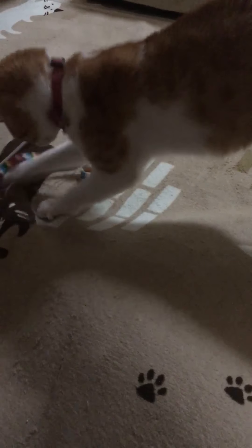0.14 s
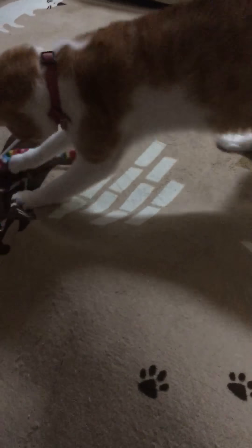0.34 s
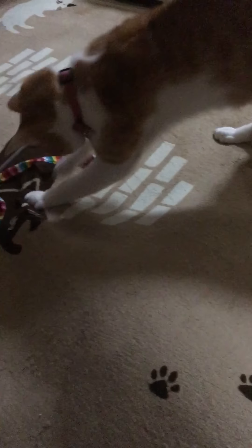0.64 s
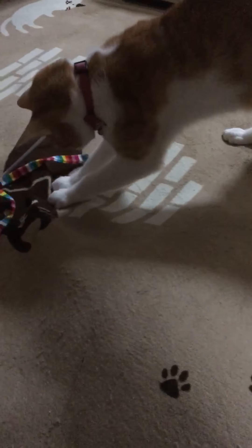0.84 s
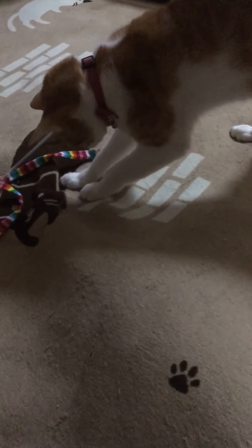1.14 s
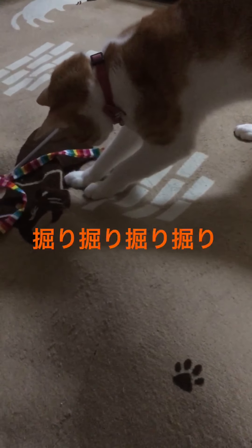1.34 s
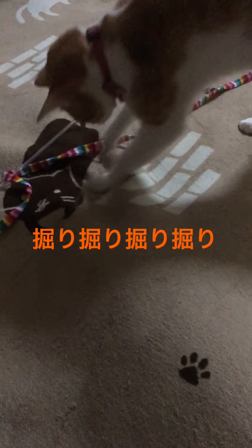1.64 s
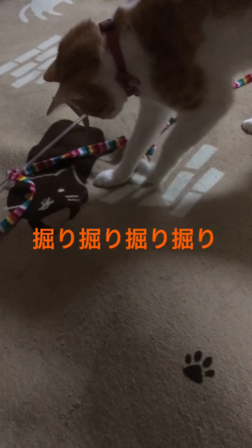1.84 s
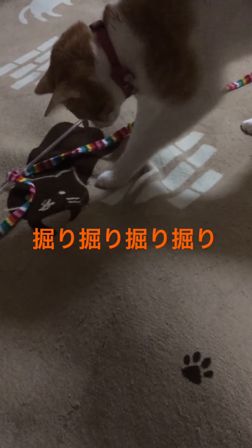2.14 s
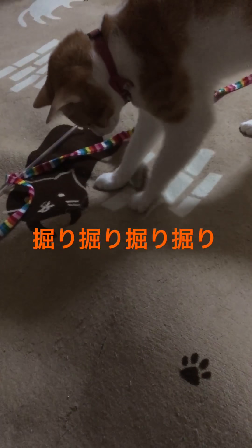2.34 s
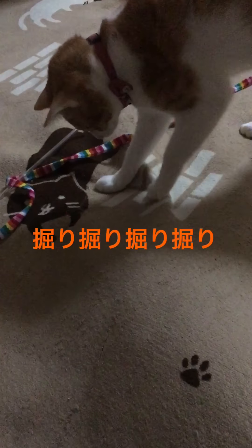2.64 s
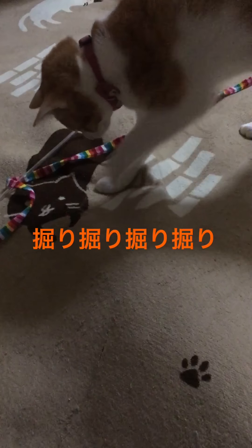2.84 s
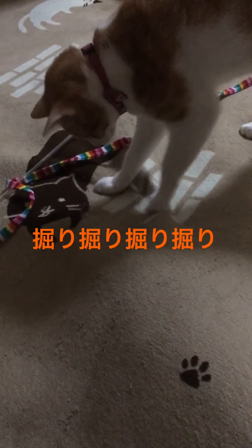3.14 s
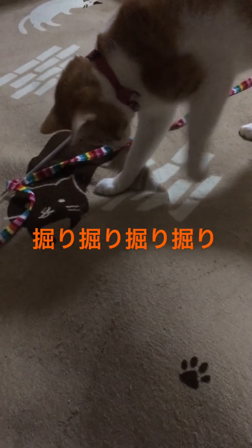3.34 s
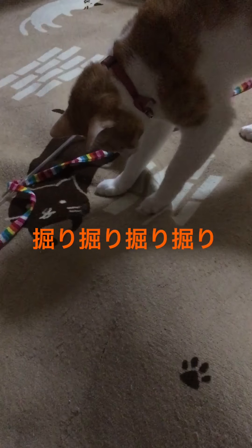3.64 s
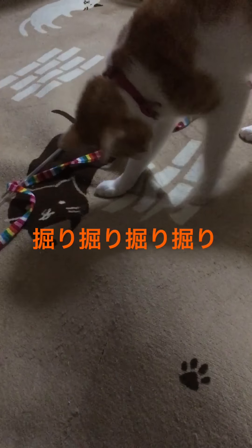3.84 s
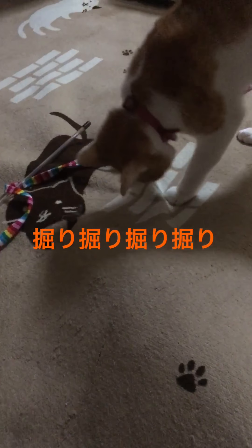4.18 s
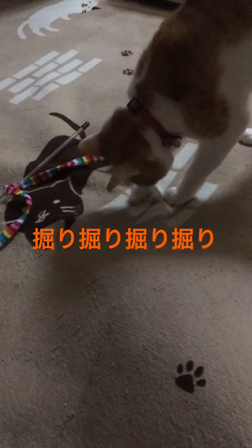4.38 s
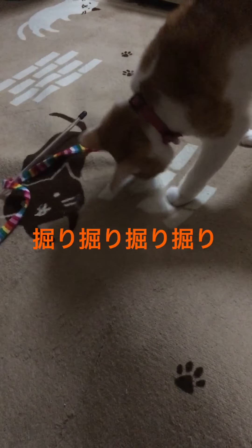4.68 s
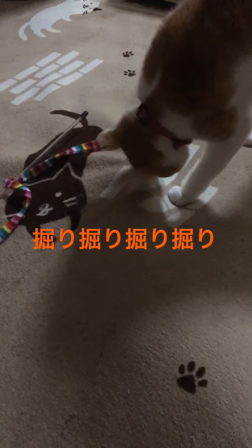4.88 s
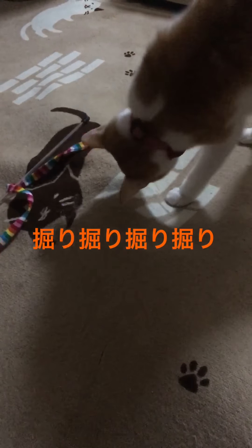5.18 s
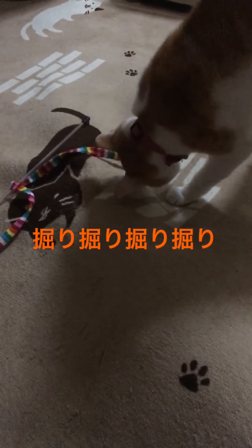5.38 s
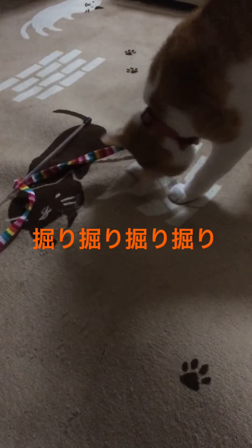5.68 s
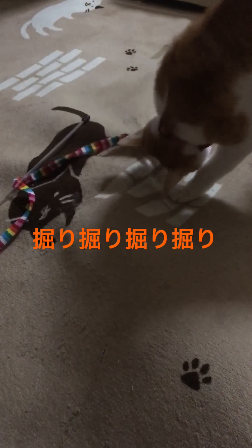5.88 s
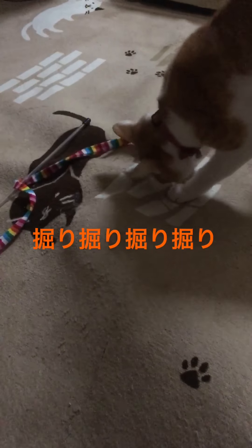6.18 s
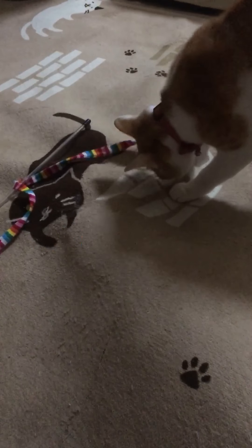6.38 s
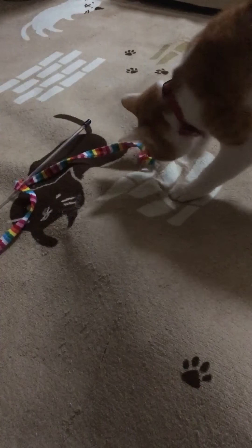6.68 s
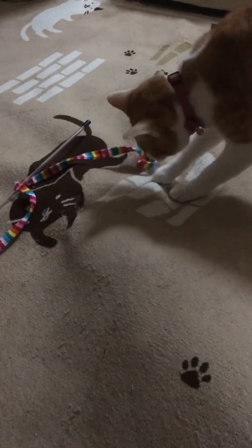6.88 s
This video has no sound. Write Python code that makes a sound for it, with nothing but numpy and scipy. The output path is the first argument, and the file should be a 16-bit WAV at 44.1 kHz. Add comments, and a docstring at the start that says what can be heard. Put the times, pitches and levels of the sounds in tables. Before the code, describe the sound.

Short scuffs of paws over carpet pile alternate with irregular plucks and snaps of caught threads. Loud snaps come early, around two seconds, near the five-second mark and in clusters near six, often with a cushioned floor thump. A tiny muffled bell rattles briefly between them. Low motor hum and soft air noise continue throughout; close mono microphone in a small indoor space.

```python
"""A cat digs at a rug: tufts flick past its paws, and claws catch in threads that let go with a snap.
The rug slaps the floor, often together with a hard snap: two soft pushes, first its edge, then its fold.
A small muffled bell on the cat's harness rattles: a pellet hits the shell and rings its damped modes.
The place is a small room with short reflections, where an appliance hums under steady air noise.
The microphone signal is mono, with the treble cut at the top."""
import sys
import numpy as np
from scipy import signal
from scipy.fft import rfft, irfft
from scipy.io import wavfile

SR = 44100
rng = np.random.default_rng(int(sys.argv[2]) if len(sys.argv) > 2 else 0)


def pcm_store(signal):
    """Save signal as 16-bit PCM."""
    levels = np.round(np.clip(np.atleast_2d(signal), -1, 1) * 32767)
    wavfile.write(sys.argv[1], SR, levels.astype(np.int16).T)


N = 309476  # samples in the scene
TAPS = 4096  # samples in each short sound


def amp(db):
    """Decibels to gain."""
    return 10 ** (np.asarray(db) / 20)


def unit(x):
    """Scales to rms 1."""
    return x / np.sqrt(np.mean(x ** 2) + 1e-20)


def read(points, hz):
    """Reads a curve on a log-frequency axis."""
    f, value = np.transpose(points)
    return np.interp(np.log(hz + 1), np.log(f + 1), value)


def add(mix, s, sound):
    """Mixes a sound in at time s in seconds."""
    part = mix[max(round(s * SR), 0):][:len(sound)]
    part += sound[:len(part)]


def bump_db(hz, centre, q):
    """Gain of a damped resonance, 0 dB near its centre; a higher q is sharper."""
    ratio = (hz + 1) / centre
    return -10 * np.log10(1 + (q * (ratio - 1 / ratio)) ** 2)


def pulse(gain_db):
    """The most compact causal (minimum-phase) pulse with the given spectrum."""
    log_gain = np.log(amp(np.maximum(gain_db, -100)))
    circle = np.r_[log_gain, log_gain[-2:0:-1]]
    # the phase follows from the log gain
    spectrum = np.exp(np.conj(signal.hilbert(circle)))
    return irfft(spectrum[:len(log_gain)])


def coloured(x, gain, band):
    """Filters x so that it has rms 1 within the band in Hz."""
    hz = np.fft.rfftfreq(N, 1 / SR)
    z = rfft(x) * gain
    in_band = irfft(z * (hz > band[0]) * (hz < band[1]), N)
    return irfft(z, N) / in_band.std()


def drift(rate):
    """Slow chance of rms 1 that varies up to about the given rate in Hz."""
    hz = np.fft.rfftfreq(N, 1 / SR)
    return unit(irfft(rfft(rng.standard_normal(N)) / (1 + (hz / rate) ** 4), N))


# Claws letting go of threads. Each row: time in seconds, strength in dB before the shared trim,
# centre of the twang in Hz, extra tick in the treble in dB, ring of the thread in Hz, ring in dB.
THREAD_SNAPS = [(0.3609, -17, 1900, -1, 4200, 7), (0.4304, -22.5, 540, 2, 3150, 8),
                (.4765, -9, 694, -8, 4250, 3), (.484, -3, 546, 0.5, 1170, 5.5),
                (.630, -0.5, 690, 1, 3700, 1.5), (1.0323, -29.5, 1450, 2, 3500, 5),
                (1.091, -21.5, 1140, 12, 3200, 10), (1.58, -25, 1400, -15, 3910, 3),
                (1.6565, -1.5, 625, 6, 1240, 5), (1.6622, -12.5, 700, -1, 12000, 13),
                (2.0162, -27, 950, 14, 3020, 11), (2.0493, -14.5, 1220, -5, 4640, 10),
                (2.1151, -5.5, 1420, -2, 2820, 7), (2.117, -2, 1130, -9.5, 3080, 2),
                (2.3884, -14.5, 1210, 2, 3130, 7.5), (2.6393, -22.5, 3290, -12, 1650, 9.5),
                (2.7285, -15.5, 1170, -10, 1970, 1.5), (2.8323, -15, 1010, 7.5, 2240, 5.5),
                (2.8716, -10.5, 880, 6.5, 1920, 1), (3.0983, -25.5, 1440, -7, 1600, 13),
                (3.2027, -21, 2930, -10, 8100, 0), (3.3756, -13, 1910, -7.5, 9100, 11.5),
                (3.392, -26, 1700, 7, 3200, 2), (3.4171, -16.5, 1300, 1, 4190, 0),
                (3.6824, -14.5, 2400, 2.5, 1280, 6.5), (3.7326, -20.5, 3290, 4, 1730, 12),
                (3.8898, -9, 1330, -1, 5000, 2.5), (4.3018, -25, 1240, 8.5, 3400, 5),
                (4.585, -27.5, 1200, 4, 2190, 8), (4.6868, -5.5, 800, 7.5, 3450, 14.5),
                (4.7368, -22, 540, 11, 1600, 13), (4.7504, -15, 960, 2, 3100, 5),
                (4.7552, -6.5, 1980, 3.5, 1600, 4), (5.1204, -4, 1130, 1, 3500, 4.5),
                (5.8697, -19, 1200, -2, 3000, -1), (5.8774, -12.5, 537, -8, 3000, 15),
                (5.8803, -3, 920, -13, 6070, 13), (5.8846, -5, 794, -2.5, 5200, 11),
                (6.534, -18, 2000, -7, 3000, -6), (6.5377, -2, 1090, -11.5, 7460, 12),
                (6.5565, -13, 550, 15.5, 2800, 11), (6.5615, 2.5, 670, -3, 1340, 8)]
# Colour that all snaps share. Each row: frequency in Hz, gain in dB.
SNAP_COLOUR = [(60, -15), (250, 1.5), (600, 2.5), (1200, 0), (2000, 0.5), (2800, -2), (3600, 0), (4900, -1),
               (6000, 1), (9000, 0), (10300, -2), (12000, 0), (16000, -9)]
# Thin little slips just before a snap, relative to it. Each row: frequency in Hz, gain in dB.
SLIP_COLOUR = [(500, -27.5), (2000, -8.5), (6000, -9), (14000, -7)]
SLIP_LEAD_S = .0018  # a thread starts to slip at most this long before it lets go


def snaps(level_db=-1.5, q=1.155, ring_q=2.24, tick_hz=4500, fray_db=-16, fray_s=0.0045,
          crackle_db=-16, crackle_s=0.014, crackles_per_s=400):
    """Each thread slips, then gives one damped twang; fibres tear and crackle as the pile springs back."""
    hz = np.fft.rfftfreq(TAPS, 1 / SR)
    t = np.arange(TAPS) / SR
    out = np.zeros(N)
    treble = (hz / tick_hz) ** 4
    tick = treble / (1 + treble)
    for s, db, twang_hz, tick_db, ring_hz, ring_db in THREAD_SNAPS + catches():
        ring = ring_db * amp(bump_db(hz, ring_hz, ring_q)) ** 2
        twang = db + level_db + bump_db(hz, twang_hz, q)
        shape = twang + ring + tick_db * tick + read(SNAP_COLOUR, hz)
        # cubed noise is spiky, like tearing fibres
        fray = rng.standard_normal(TAPS) ** 3 * np.exp(-t / fray_s)
        sparks = rng.standard_normal(TAPS) * (rng.random(TAPS) < crackles_per_s / SR)
        crackle = sparks * np.exp(-t / crackle_s)
        release = (amp(fray_db) * unit(fray) + amp(crackle_db) * unit(crackle)) / np.sqrt(TAPS)
        release[0] += 1  # the clean snap itself
        add(out, s, -signal.fftconvolve(pulse(shape), release))
        slip = pulse(shape + read(SLIP_COLOUR, hz))
        for lead in SLIP_LEAD_S * rng.random(size=3):
            add(out, s - lead, rng.choice([-1, 1]) * slip)
    return through_rug(out)


def through_rug(x, lag_s=0.00035):
    """Bending waves in the backing: low tones travel slower, so snaps glide down; lag_s is at 1 kHz."""
    hz = np.fft.rfftfreq(N, 1 / SR)
    turns = 2 * lag_s * np.sqrt(1000 * hz)
    return irfft(rfft(x) * np.exp(-2j * np.pi * turns), N)


# A paw slides over the pile. Each row: start in seconds, length in seconds,
# level in dB before the trims, brightness in dB (claw tips relative to that level).
PAW_STROKES = [(-.02, .17, -72, -23), (0.235, 0.11, -71, 2), (0.319, 0.19, -68, -2), (.63, 0.12, -69, -13),
               (0.769, 0.047, -72.5, -4), (0.848, 0.074, -72, -14), (1.017, .14, -76, -16),
               (1.408, 0.074, -70.5, -16), (1.521, 0.11, -71.5, -8), (1.685, 0.21, -70, -4.5),
               (2.024, 0.11, -76, 0), (2.293, 0.17, -71.5, -5), (2.597, 0.069, -68, -11),
               (2.8, 0.086, -91, -16), (3.07, 0.055, -72.5, -2), (3.146, 0.093, -67, -3.5),
               (3.277, 0.26, -76, -14), (3.619, 0.085, -77, -6), (3.87, 0.062, -86, 7),
               (4.122, 0.094, -76, 0.5), (4.28, 0.083, -77.5, -2), (4.487, 0.034, -71, -5),
               (4.56, 0.15, -74.5, -2), (4.854, 0.15, -79, 0), (5.315, 0.045, -75, -5),
               (5.521, 0.049, -82, 4), (5.646, 0.046, -75, -6), (6.308, 0.049, -77.5, -17),
               (6.71, 0.14, -85.5, 8)]
# Colour of a single fibre's catch: centre of the twang in Hz, extra tick in the treble in dB,
# ring in Hz, ring in dB.
CATCH_COLOUR = (1600, 4.4, 2900, 6.2)
# strength above the stroke's level, and its scatter
CATCH_DB, CATCH_SPREAD_DB = 33, 0.5


def catches(count=2):
    """Single fibres catch at random moments of each stroke: faint snaps, stronger in louder strokes."""
    places = rng.random((len(PAW_STROKES), count))
    chances = rng.standard_normal((len(PAW_STROKES), count))
    rows = []
    for (start, length, db, _), some_places, some_chances in zip(PAW_STROKES, places, chances):
        for place, chance in zip(some_places, some_chances):
            s = max(start + place * length, 0)
            rows.append((s, db + CATCH_DB + CATCH_SPREAD_DB * chance, *CATCH_COLOUR))
    return rows


# The pile under the soft pads. Each row: frequency in Hz, gain in dB.
PAD_COLOUR = [(150, 16.5), (500, 8), (1200, 0), (2200, 3.5), (2900, -2), (3800, -1.5), (4900, -4.5),
              (5800, -1), (6900, -17), (9000, -46), (16000, -27)]
# The pile under the claw tips. Each row: frequency in Hz, gain in dB.
TIP_COLOUR = [(1500, -64), (4000, -49), (6500, 1.5), (9200, 9.5), (10300, -1), (12000, 4), (15000, -2),
              (16500, -9)]
# fur and paws stir on the pile between strokes: level before the trims, and brightness
RESTING_DB, RESTING_BRIGHT_DB = -80.5, -3.5


def brushing(pads_db=-3, tips_db=-6.0, fibres_per_s=4000, spread_db=-0.5, uneven_db=2.5):
    """Thousands of tufts flick past the paw, in uneven clumps whose level follows each stroke."""
    hz = np.fft.rfftfreq(N, 1 / SR)
    t = np.arange(N) / SR
    coarse = t[::64]
    pad_power = amp(RESTING_DB) ** 2
    tip_power = amp(RESTING_DB + RESTING_BRIGHT_DB) ** 2
    for start, length, db, bright_db in PAW_STROKES:
        power = (amp(db) * pressure(coarse, start, length)) ** 2
        pad_power = pad_power + power
        tip_power = tip_power + power * amp(bright_db) ** 2
    flicks = rng.standard_normal(N) * (rng.random(N) < fibres_per_s / SR)
    tufts = flicks * amp(spread_db * np.minimum(rng.exponential(1, N), 4))
    tufts *= amp(uneven_db * drift(46))
    pads = coloured(tufts, amp(read(PAD_COLOUR, hz)), (1800, 5000))
    tips = coloured(tufts, amp(read(TIP_COLOUR, hz)), (9000, 13500))
    pad_level = amp(pads_db) * np.interp(t, coarse, np.sqrt(pad_power))
    tip_level = amp(tips_db) * np.interp(t, coarse, np.sqrt(tip_power))
    return pad_level * pads + tip_level * tips


def pressure(t, start, length, attack_s=0.017, release_s=0.046):
    """One stroke: the paw presses in, slides, and lifts away."""
    press = np.clip((t - start) / attack_s, 0, 1)
    lift = np.exp(-np.maximum(t - start - length, 0) / release_s)
    return press * lift


# The lifted rug falls back, edge first, then the whole fold. Each row: time in seconds, edge in dB,
# pitch of the edge in Hz, fold in dB, pitch of the fold in Hz; both levels before the shared trim.
RUG_FALLS = [(.341, -17, 200, 8, 81.4), (.477, 9, 215, 13.5, 127), (.629, 3.5, 196, 12, 88),
             (1.6572, 12, 169, 6.5, 87), (2.117, 3.5, 342, 6.5, 70.5), (3.892, -9.5, 310, -12, 150),
             (4.688, -1.5, 350, 7.5, 140), (4.756, 4.5, 224, 13.5, 110), (5.120, 5, 340, 10.5, 130),
             (5.678, -13.5, 454, -22, 150), (5.879, 2, 288, 6.5, 202), (6.538, 2, 307, 2, 150),
             (6.5616, 11.5, 233, 7.5, 80)]
# Resonances of the floor under the rug. Each row: frequency in Hz, sharpness (Q), lift in dB.
FLOOR_MODES = [(87, 1.4, 6.5), (222, 4.5, 8), (380, 5.9, 7), (429, 19, 1.5)]
FOLD_LAG_S = 0.00706  # the fold lands this long after the edge


def thuds(level_db=-1.5, q=1.32, softness=1.76):
    """The rug lands on the resonant floor with two soft, quickly damped pushes; its cushion dulls them."""
    hz = np.fft.rfftfreq(TAPS, 1 / SR)
    out = np.zeros(N)
    floor_db = sum(db * amp(bump_db(hz, f, sharp)) ** 2 for f, sharp, db in FLOOR_MODES)
    for s, edge_db, edge_hz, fold_db, fold_hz in RUG_FALLS:
        for lag, db, thud_hz in (0, edge_db, edge_hz), (FOLD_LAG_S, fold_db, fold_hz):
            cushion_db = -10 * np.log10(1 + (hz / (softness * thud_hz)) ** 4)
            push = pulse(bump_db(hz, thud_hz, q) + cushion_db + floor_db)
            add(out, s + lag, amp(db + level_db) * push)
    return out


# Modes of the harness bell. Each row: frequency in Hz, relative level in dB, decay by 60 dB in seconds.
BELL_MODES = [(5642, -7, .05), (5724, 0, .04), (5880, -5, .025), (6450, -11, .008), (7400, -6, .007),
              (8150, 0, .005), (8800, -2, .004), (14228, 0, .04), (14590, -4, .025)]


def bell(low_db=-3, high_db=-3, bounce_db=-6, bounces_per_s=450, settle_s=0.011, uneven_db=3, count=24):
    """The pellet hits the shell and chatters to rest; low and high modes have their own level per hit."""
    t = np.arange(TAPS) / SR
    out = np.zeros(N)
    for s, low, high in pellet_hits():
        delays = np.cumsum(rng.uniform(.3, 1.7, count)) / bounces_per_s
        forces = rng.uniform(0.99, 1, count) * rng.choice([-1, 1], count)
        hits = np.zeros(TAPS)
        hits[0] = 1
        for delay, force in zip(delays, forces):
            bounce = amp(bounce_db) * force * np.exp(-delay / settle_s)
            add(hits, delay, np.array([bounce]))
        ring = np.zeros(TAPS)
        for hz, db, t60 in BELL_MODES:
            strength = low + low_db if hz < SR / 4 else high + high_db
            # the place that is struck sets the sign and share of each mode
            share = rng.choice([-1, 1]) * amp(strength + db + uneven_db * rng.standard_normal())
            ring += share * np.exp(-np.log(1000) * t / t60) * np.sin(2 * np.pi * hz * t)
        add(out, s, signal.fftconvolve(hits, ring))
    return out


# A movement shakes the bell. Each row: time in seconds, number of pellet hits,
# level of the low modes in dB, level of the high modes in dB; both for the first hit, before the trims.
BELL_SHAKES = [(.246, 2, -64, -73), (0.28, 2, -57, -55), (0.364, 1, -63, -61), (.5, 1, -70, -54),
               (0.566, 3, -63, -56), (.803, 1, -63, -58), (1.686, 2, -54.5, -61), (2.18, 1, -66, -65),
               (2.269, 1, -61.5, -72), (2.306, 2, -51.5, -52), (2.37, 1, -48.5, -60), (2.987, 1, -57, -53),
               (3.012, 2, -49.5, -69), (3.069, 2, -55.5, -66), (3.603, 1, -55.5, -81), (3.70, 2, -69, -65),
               (4.411, 3, -61.5, -64), (4.661, 1, -59, -72), (4.956, 2, -64, -81), (5.197, 3, -60, -73),
               (5.251, 1, -57, -58), (5.571, 1, -68, -84), (5.732, 1, -65, -53.5), (5.764, 1, -62, -77),
               (6.019, 2, -65.5, -68), (6.788, 1, -66, -67), (6.826, 1, -60.5, -83)]
# the pellet's trip across the shell, its share of chance, change of level per trip
CROSSING_S, CROSSING_JITTER, SHAKE_FADE_DB = .022, 0.15, -1.5


def pellet_hits():
    """The shaken pellet flies from wall to wall, losing force: rows of (s, low modes dB, high modes dB)."""
    rows = []
    for s, hits, low, high in BELL_SHAKES:
        for trip in range(round(hits)):
            fade = trip * SHAKE_FADE_DB
            rows.append((s, low + fade, high + fade))
            s += CROSSING_S * (1 + CROSSING_JITTER * rng.uniform(-1, 1))
    return rows


# Steady air of the room. Each row: frequency in Hz, relative density in dB per Hz.
AIR_COLOUR = [(20, -33), (30, -11.5), (42, -6), (60, -3.5), (100, 1), (140, -6), (260, -16), (380, -13.5),
              (480, -19.5), (1100, -21.5), (2000, -34), (5700, -43), (15400, -47), (16300, -68)]
# Room resonances that lift the air noise. Each row: frequency in Hz, width in Hz, lift in dB.
ROOM_MODES = [(40.3, 8.6, 13.5), (75, 6.9, -0.5), (98, 9.7, 3), (176.5, 7.8, 14.5), (318, 59, 5.5),
              (393, 16, 4.5)]
# Appliance motor and mains tones: each frequency in Hz.
HUM_HZ = [112.6, 120, 225.2, 337.8]
# The same tones in the same order: each level in dB rms.
HUM_DB = [-50.8, -64, -74, -74]
AIR_DB = -64  # rms between 300 and 1500 Hz


def background():
    """A motor hum beats gently against the mains tone over the steady air of the room."""
    hz = np.fft.rfftfreq(N, 1 / SR)
    t = np.arange(N) / SR
    modes_db = sum(db / (1 + (2 * (hz - f) / width) ** 2) for f, width, db in ROOM_MODES)
    shape = read(AIR_COLOUR, hz) + modes_db
    air = coloured(rng.standard_normal(N), amp(shape), (300, 1500))
    hum = np.zeros(N)
    for f, db in zip(HUM_HZ, HUM_DB):
        hum += np.sqrt(2) * amp(db) * np.sin(2 * np.pi * (f * t + rng.random()))
    return amp(AIR_DB) * air + hum


# Decay of the room's tail by band. Each row: frequency in Hz, decay by 60 dB in seconds.
ROOM_T60 = [(100, 0.25), (260, 0.0534), (700, 0.2566), (1840, 0.26), (4850, 0.35), (14000, 0.44)]
# Colour of the tail. Each row: frequency in Hz, gain in dB.
TAIL_COLOUR = [(60, 5), (130, 4), (250, 2), (700, 4), (2000, -1), (5000, -2), (14000, -5.5)]
# First reflections at the microphone. Each row: delay in seconds, level in dB against the direct sound.
REFLECTIONS = [(.0034, -31.5), (.0062, -21), (0.0105, -29), (0.014, -28), (.0215, -46), (0.0234, -29)]


def room(x, wet_db, build_s=0.006):
    """Direct sound, a few first reflections, and a short diffuse tail that decays by band."""
    noise = rng.standard_normal(SR // 2)
    hz, t, z = signal.stft(noise, SR, nperseg=256)
    decay = np.exp(-np.log(1000) * t / read(ROOM_T60, hz)[:, None])
    tail = signal.istft(z * decay, SR, nperseg=256)[1][:len(noise)]
    # the tail builds up softly
    tail *= 1 - np.exp(-(np.arange(len(tail)) / SR / build_s) ** 2)
    colour = pulse(read(TAIL_COLOUR, np.fft.rfftfreq(TAPS, 1 / SR)))
    response = amp(wet_db) * signal.fftconvolve(tail / np.linalg.norm(tail), colour)
    for delay, db in REFLECTIONS:
        add(response, delay, amp([db]))
    return x + signal.fftconvolve(x, response)[:N]


def scene():
    """The cat's sounds in the room, over the hum; the thuds carry the most tail."""
    snapping = room(snaps(), wet_db=-8.5)
    slapping = room(thuds(), wet_db=-1.5)
    rattling_and_brushing = room(bell() + brushing(), wet_db=-10.5)
    return (snapping + slapping + rattling_and_brushing + background())[None]


def record(dry):
    """The recorder's band limit: a steep lowpass at 16400 Hz."""
    lowpass = signal.firwin(255, 16400, window=("kaiser", 8), fs=SR)
    return signal.oaconvolve(dry, lowpass[None], "same")


dry = scene()
out = record(dry)
pcm_store(out)
```